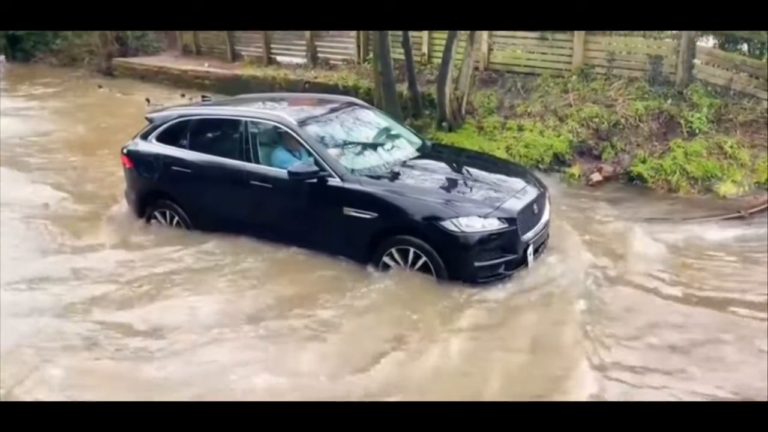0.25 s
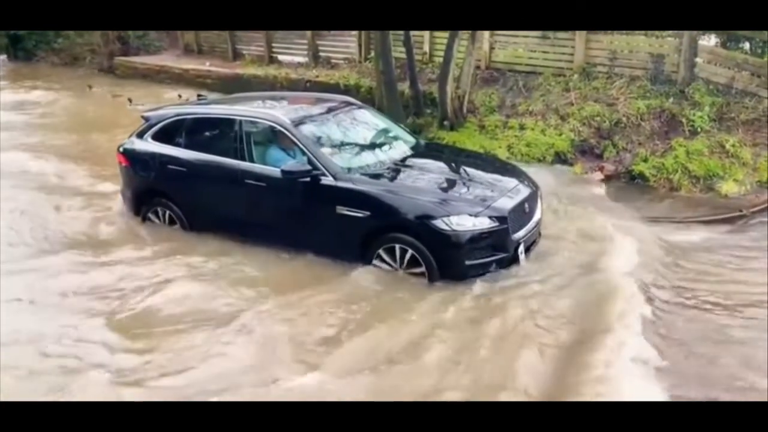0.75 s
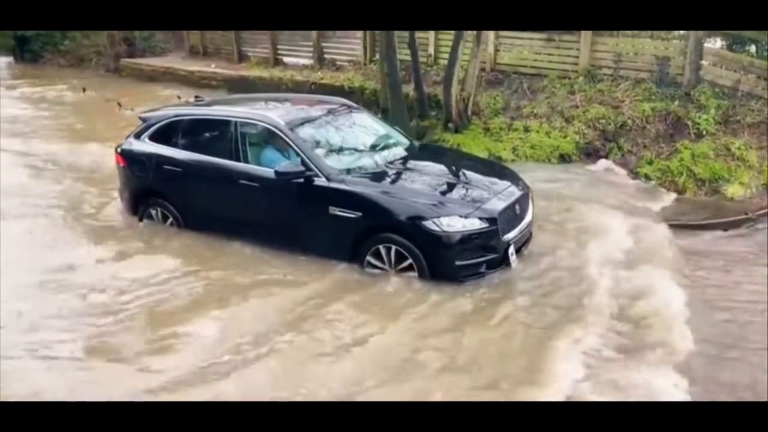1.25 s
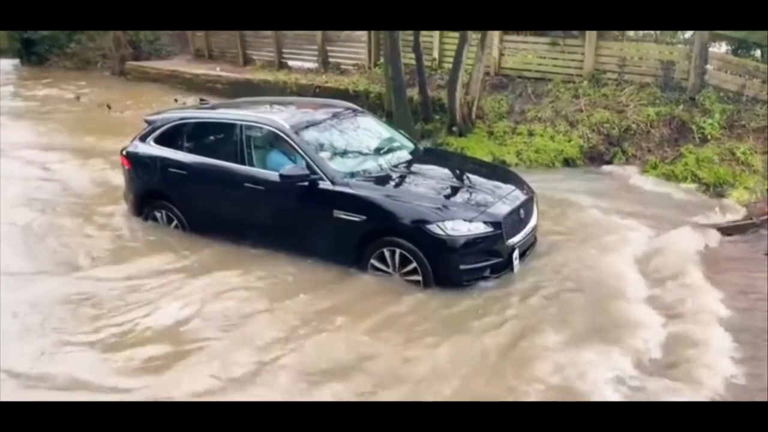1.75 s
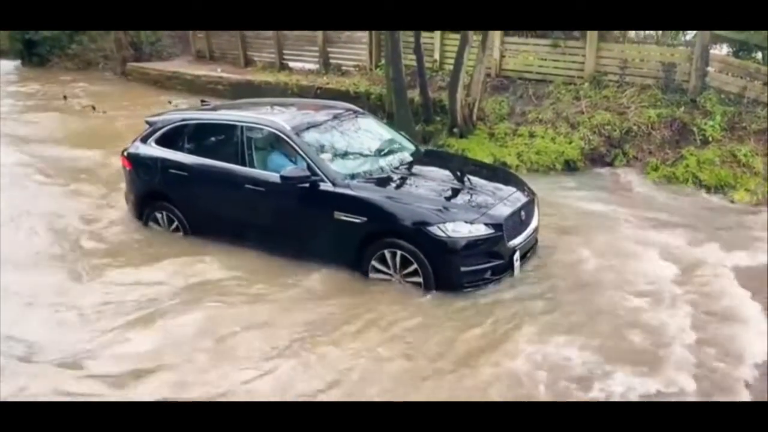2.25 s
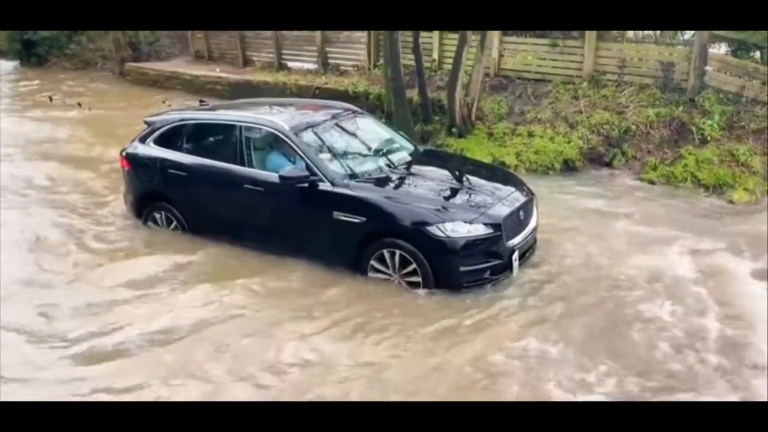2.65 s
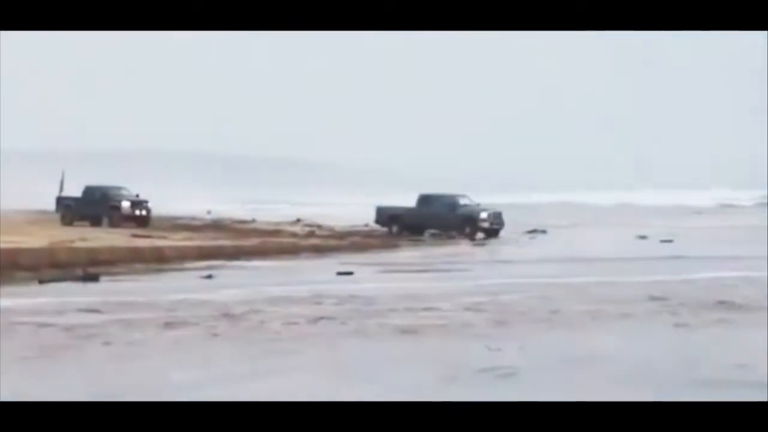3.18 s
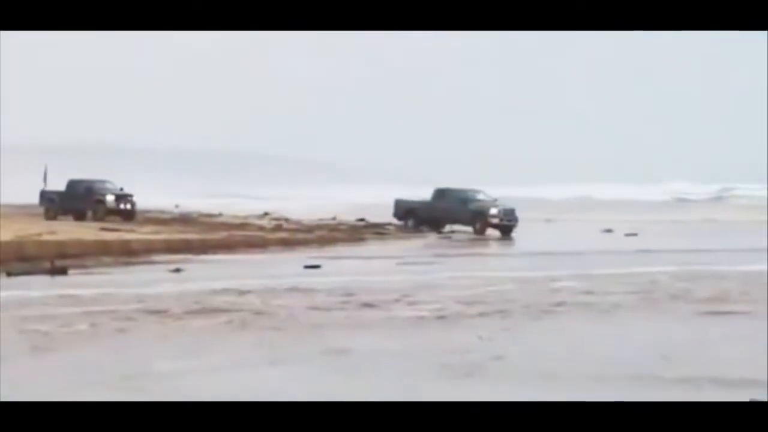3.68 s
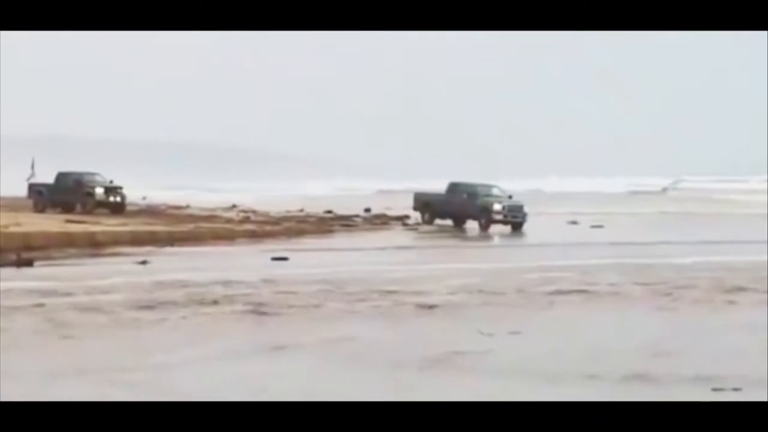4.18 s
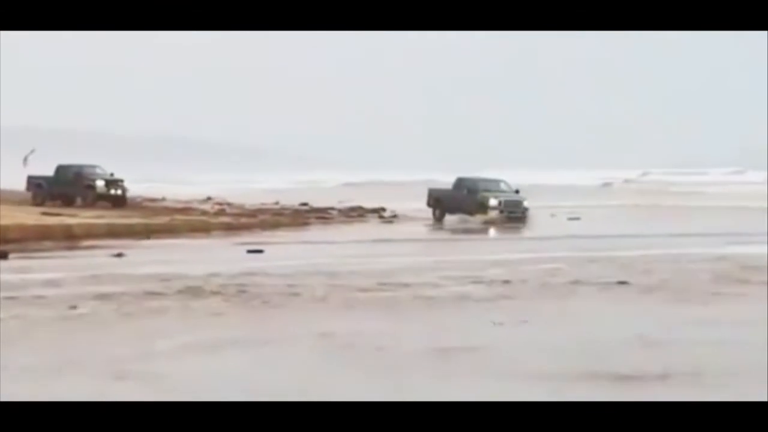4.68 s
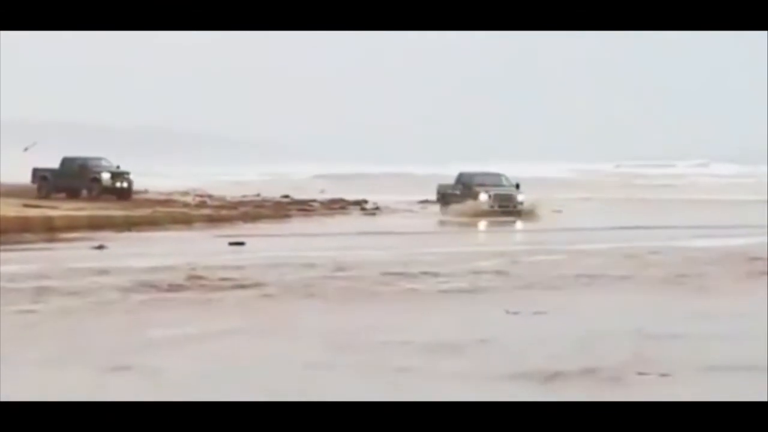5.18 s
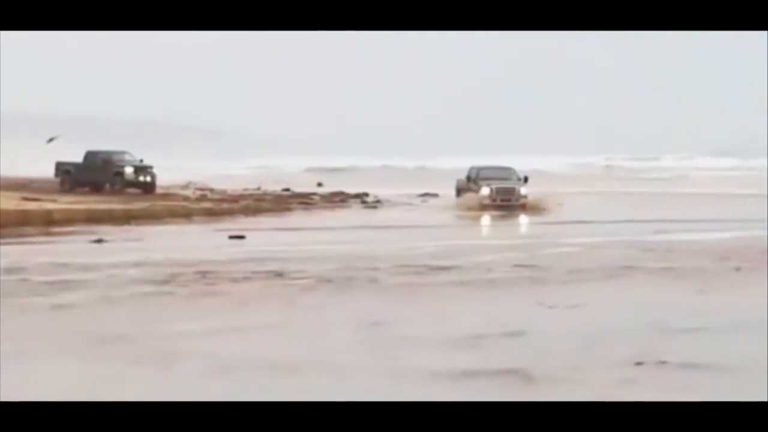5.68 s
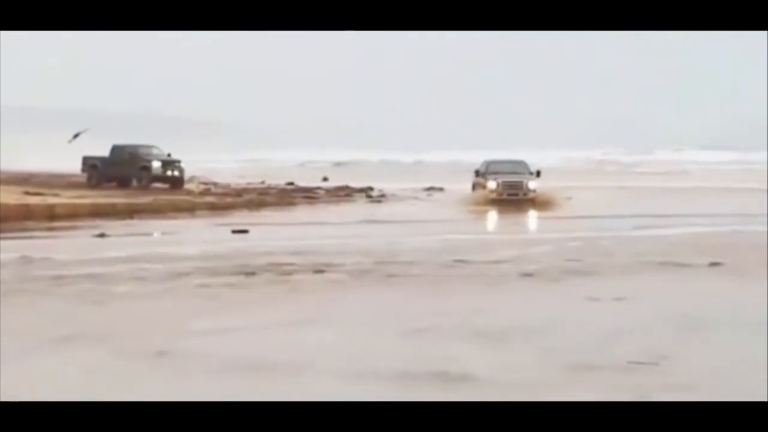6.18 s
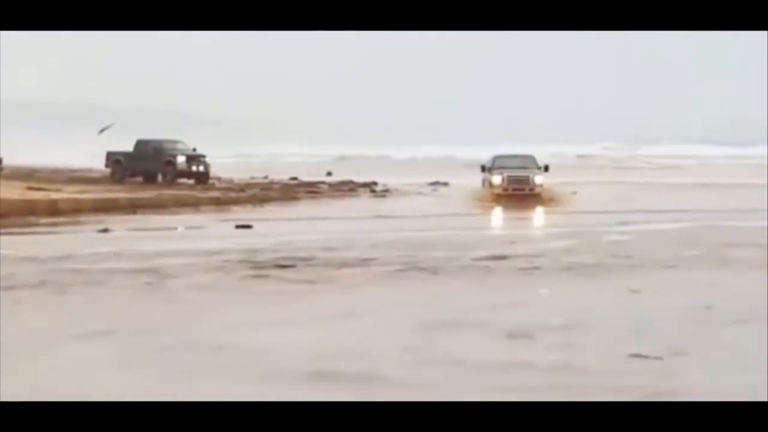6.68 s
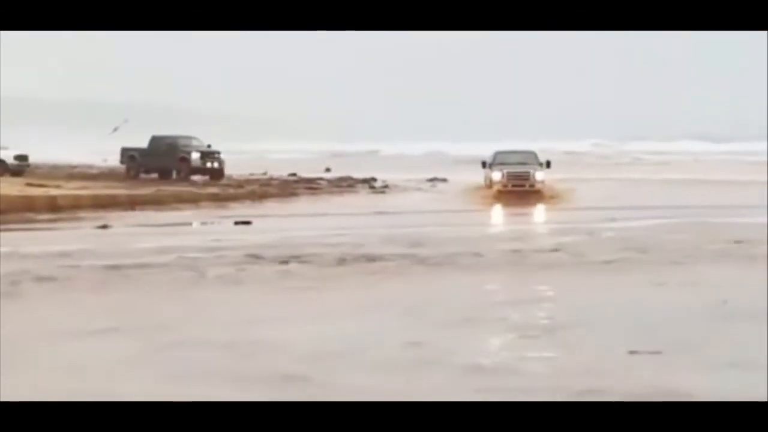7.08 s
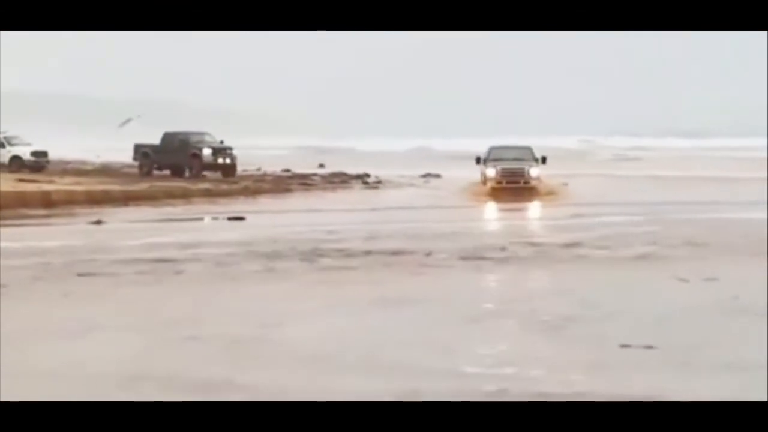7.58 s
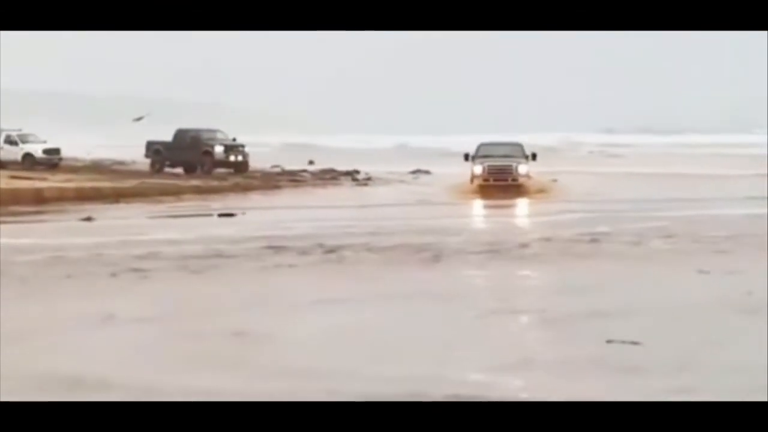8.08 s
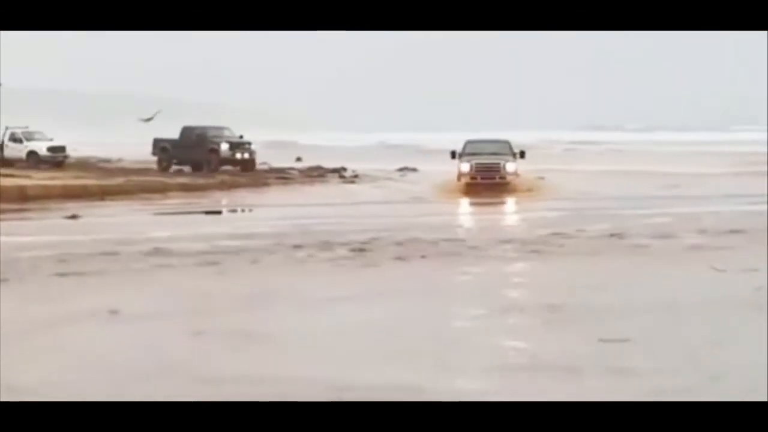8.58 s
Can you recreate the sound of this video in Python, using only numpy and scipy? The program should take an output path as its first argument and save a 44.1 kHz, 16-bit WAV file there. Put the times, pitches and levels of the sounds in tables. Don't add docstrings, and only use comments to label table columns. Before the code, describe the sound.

Close stereo water first: a car's bow wave sloshes, rushes and fizzes with gulping bubbles, strongest early, then fading away. An abrupt cut leads to an open beach, quieter at first, where low surf roar and churned water swell as a pickup wades closer. Wheels slap the water with hollow plops; one engine drones, another revs, a third blips its throttle. The beach treble is patchy, like coarse camera audio.

```python
import sys
import numpy as np
from scipy import signal
from scipy.fft import rfft, irfft, next_fast_len
from scipy.io import wavfile
from scipy.ndimage import uniform_filter1d, map_coordinates

SR = 44100
rng = np.random.default_rng(int(sys.argv[2]) if len(sys.argv) > 2 else 0)


def store_pcm(level_fs):
    pcm = np.round(np.clip(level_fs, -1, 1) * 32767).astype(np.int16)
    wavfile.write(sys.argv[1], SR, np.atleast_2d(pcm).T)


def convert_level_to_amplitude(level_db):
    exponent = np.asarray(level_db, float) / 20
    return 10 ** exponent


N = 389844
TIME = np.arange(N) / SR
LANE_END_S, BEACH_START_S = 2.589, 2.604
NEAREST_DB = -27


def unit(x):
    return x / np.sqrt(np.mean(x ** 2) + 1e-20)


def curves(rows):
    s, *cols = np.transpose(rows)
    return [np.interp(TIME, s, c) for c in cols]


def along(points, hz):
    f, *cols = np.transpose(points)
    return [np.interp(np.log(hz + 1), np.log(f + 1), c) for c in cols]


def wobble(rate):
    knots = rng.standard_normal(int(N * rate / SR) + 4)
    return map_coordinates(knots, [TIME * rate])


def patches(patchy_db, bins, frames):
    z = signal.stft(rng.standard_normal((2, N)), nperseg=512)[2]
    field = rng.standard_normal(z.shape[1:])
    field = uniform_filter1d(field, size=bins, axis=0)
    field = uniform_filter1d(field, size=frames, axis=1)
    return signal.istft(z * convert_level_to_amplitude(patchy_db * unit(field)), nperseg=512)[1][:, :N]


def spread(two, colour, pair, lo_hz, hi_hz):
    m = next_fast_len(N + 8192)
    hz = np.fft.rfftfreq(m, 1 / SR)
    band = np.sqrt((1 + (lo_hz / (hz + 1)) ** 8) * (1 + (hz / hi_hz) ** 8))
    a, b = rfft(two, m) * convert_level_to_amplitude(along(colour, hz)[0]) / band
    alike, lead, pan_db = along(pair, hz)
    turn = np.arccos(np.clip(alike, 0, 1)) / 2
    side = np.array([[1], [-1]])
    ports = np.cos(turn) * a + side * np.sin(turn) * b
    ports = ports * convert_level_to_amplitude(side * pan_db / 2) * np.exp(-.5j * side * lead)
    ports = irfft(ports, m)[:, :N]
    return ports / np.sqrt(np.mean(ports.mean(0) ** 2))


def bubbles(s, db, hz, cycles, rise):
    t = np.arange(int(3 * SR * np.max(cycles / hz)))[None] / SR
    u = t * (hz / cycles)[:, None]
    ring = np.sin(2 * np.pi * hz[:, None] * t * (1 + rise * u))
    wave = ring * np.e * 3 * u * np.exp(-3 * u) * convert_level_to_amplitude(db)[:, None]
    at = (s * SR).astype(int)[:, None] + np.arange(t.size)
    return np.bincount(at.ravel(), wave.ravel(), N + SR)[:N]


def swarm(count, t0, t1, hz, cycles, spread_db):
    def cloud(draw):
        start_s = t0 + (t1 - t0) * draw[:, 0]
        pitch_hz = hz * np.exp(2.19 * (draw[:, 1] - .5))
        level_db = -spread_db * np.log(draw[:, 2] + .02)
        return bubbles(start_s, level_db, pitch_hz, np.full(count, cycles), rise=.12)

    clouds = np.array([cloud(draw) for draw in rng.random((2, count, 3))])
    return unit(clouds) * np.sqrt((t1 - t0) * SR / N)


def tone(hz, db, jitter, shake_db):
    phase = 2 * np.pi * np.cumsum(hz * (1 + jitter * wobble(15))) / SR
    return phase, np.sqrt(2) * convert_level_to_amplitude(db + shake_db * wobble(18)) * np.sin(phase)


def passage(rows, db, jitter, shake_db):
    hz, = curves(rows)
    edge = np.clip(np.minimum(TIME - rows[0][0], rows[-1][0] - TIME + 0.04) / 0.01 + 1, 0, 1)
    phase, wave = tone(hz, db, jitter, shake_db)
    return edge * (wave + convert_level_to_amplitude(db - 17.0) * np.sin(2 * phase + 1.6))


# pitch_hz, level_db (per Hz)
SURF_COLOUR = [(18, -65), (30, -19.5), (49, -20.5), (200, -2), (396, -7.5), (544, -15.5), (599, -11.5),
               (823, -11), (1370, -16.5), (2180, -14.5), (3630, -20.5), (6360, -37), (9390, -38),
               (10100, -36.5), (13100, -62.5), (22000, -120)]
# pitch_hz, likeness_0_to_1, right_lead_rad, left_over_right_db
SURF_PAIR = [(30, .75, 0, .3), (60, .93, 0, .3), (130, .975, .03, .1), (350, .89, .1, .3),
             (700, .7, .28, .8), (1050, .5, .38, 1.2), (1400, .25, .7, 2), (2050, .25, 1.5, 2),
             (2750, .1, 3, 4.4), (5200, .07, 6.3, 4.5), (7000, .2, 6.3, 0)]


def surf(spray_db):
    def layer_db(over_spray_db, grows):
        return NEAREST_DB + over_spray_db + grows * (spray_db - NEAREST_DB)

    def heard(noise, lo_hz, hi_hz):
        return spread(noise, SURF_COLOUR, SURF_PAIR, lo_hz, hi_hz)

    surge = wobble(10)
    roar_db = layer_db(4, 0.8) - 1.13 + 0.34 * wobble(25)
    wash_db = layer_db(.5, 0.92) + 0.6 + 0.35 * surge
    roar = heard(patches(1.84, bins=2, frames=5), 15, 460) * convert_level_to_amplitude(roar_db)
    wash = heard(patches(1.4, bins=4, frames=6), 488, 1400) * convert_level_to_amplitude(wash_db)
    spray = heard(patches(1.7, bins=7, frames=5), 1400, 6000) * convert_level_to_amplitude(spray_db + 0.54 + 0.26 * surge)
    mist = heard(patches(1.2, bins=10, frames=4), 6000, 20000) * convert_level_to_amplitude(layer_db(-12.5, 1.14))
    return roar + wash + spray + mist


def drone(near_db):
    turned_away = np.clip((TIME - 7.2) / .3 + .5, 0, 1)
    line_db = -33.5 + 1.1 * (near_db - NEAREST_DB) - 8.5 * turned_away
    third_db = -37.5 - 3 * (N / SR - TIME)
    phase, line = tone(196.6, line_db, jitter=.001, shake_db=2)
    second = convert_level_to_amplitude(line_db - 7) * np.sin(2 * phase)
    third = convert_level_to_amplitude(third_db + 1.5 * wobble(8)) * np.sin(3 * phase)
    fourth = convert_level_to_amplitude(third_db - 3.5 + 3 * wobble(3.4)) * np.sin(4 * phase)
    return line + np.sqrt(2) * (second + third + fourth)


# start_s, length_s, first_pitch_hz, peak_level_db
BLIPS = [
    (7.58, .29, 172, -21.5),
    (8.04, .13, 252, -32),
]


def blip(s, length, hz, db):
    climb_hz_per_s, edge_drop_db = 285, 13
    arch_db = db - edge_drop_db * np.clip(2 * (TIME - s) / length - 1, -1, 1) ** 2
    rows = [(s, hz), (s + length, hz + climb_hz_per_s * length)]
    return passage(rows, arch_db, jitter=.002, shake_db=.4)


# time_s, pitch_hz
FIRING = [
    [(2.63, 149), (2.854, 137), (3.16, 120), (3.6, 105)],
    [(6.1, 103), (6.3, 114.5), (6.6, 117), (6.89, 120), (7.3, 136), (7.66, 135), (8.16, 138), (8.84, 140.5)],
]


def rev(rows, near_db):
    below_hz = 136 - curves(rows)[0]
    level_db = near_db + 2.6 - .62 * below_hz
    lumpy_db = .5 + .12 * np.clip(below_hz, 0, None)
    return passage(rows, level_db, jitter=.006, shake_db=lumpy_db)


def engines(near_db):
    revs = sum(rev(rows, near_db) for rows in FIRING)
    return drone(near_db) + revs + sum(blip(*row) for row in BLIPS)


# start_s, peak_level_db, pitch_hz, ring_cycles
THUMPS = [(2.614, -32, 173, 1.6), (2.686, -22, 159, 3.1), (2.864, -22, 199, 2.7), (4.334, -15, 250, 3),
          (4.772, -16.5, 293, 3.9), (4.959, -17, 257, 2.3), (5.467, -12, 195, 2.4), (6.658, -12, 212, 4.3),
          (6.78, -15, 317, 2.1), (7.564, -12, 320, 4), (8.0, -17, 298, 2.5)]


def wheel_thumps():
    return convert_level_to_amplitude(-3.0) * bubbles(*np.transpose(THUMPS), rise=0.016)


# pitch_hz, mid_step_over_signal_db, side_step_over_signal_db,
# step_scatter_db, level_scatter_db
COARSE = [(510, -40, -42, 1.5, 0.28), (1520, -14, -15.5, 2, 0.2), (2990, -5, -5, 1.5, 0),
          (5530, 2.5, 0, 2.5, 1.9), (6750, 6.5, 4.5, 2.5, 2.3), (7420, 6.5, 10, 3.5, 4),
          (9060, 7, 9.5, 3.5, 2.5), (10370, 8.5, 10.5, 3.5, 3.5)]


def beach_camera(pair):
    hop, width, bands = 1024, 32, 15
    window = signal.windows.kaiser_bessel_derived(2 * hop, 4 * np.pi)
    k = np.arange(bands * width) + .5
    angle = np.pi / hop * k[:, None] * (np.arange(2 * hop) + .5 + hop / 2)
    basis = window * np.cos(angle) * np.sqrt(2 / hop)
    lead = 2 * hop - 480
    x = np.pad([pair[0] + pair[1], pair[0] - pair[1]], ((0, 0), (lead, 2 * hop)))
    x = x[:, :x.shape[1] // hop * hop].reshape(2, -1, hop)
    lines = np.concatenate([x[:, :-1], x[:, 1:]], 2) @ basis.T
    count = lines.shape[1]

    power = uniform_filter1d(lines ** 2, size=9, axis=1)
    level = np.sqrt(uniform_filter1d(power, size=width, axis=2) + 1e-20)
    mid_db, side_db, scatter_db, mottle_db = along(COARSE, k * SR / 2 / hop)
    chance = rng.standard_normal((2, count, bands))
    chance[1] = uniform_filter1d(chance[1], size=3, axis=0) * 1.5 - .55 * chance[0]
    chance = chance.repeat(width, 2) + .7 * rng.standard_normal((count, 1))
    step = level * convert_level_to_amplitude(np.array([mid_db, side_db])[:, None] + scatter_db * chance)

    whole = np.floor(np.abs(lines) / step + 0.37)
    busy = whole.reshape(2, -1, bands, width).sum(3).repeat(width, 2) > 2
    drift = uniform_filter1d(rng.standard_normal((count, bands)), size=4, axis=0)
    drift = drift.repeat(width, 1) * 2
    frames = (np.sign(lines) * whole * step * busy * convert_level_to_amplitude(mottle_db * drift)) @ basis
    joined = (frames[:, 1:, :hop] + frames[:, :-1, hop:]).reshape(2, -1)
    mid, side = joined[:, lead - hop:][:, :N] / 2
    return np.array([mid + side, mid - side])


# time_s, level_db
NEARNESS = [
    (2.64, -40.5),
    (3.3, -41.5),
    (3.76, -37.5),
    (4.38, -34),
    (5, -31.5),
    (6.5, -27.5),
    (7.1, -27),
    (8.84, -27),
]


def beach():
    spray_db, = curves(NEARNESS)
    heard = surf(spray_db) + wheel_thumps() + engines(spray_db)
    fade_in = np.clip((TIME - BEACH_START_S) / 0.0066, 0, 1) ** 3
    return beach_camera(heard * (TIME > 2.5)) * fade_in


# start_s, peak_level_db, pitch_hz, ring_cycles
GULPS = [(.049, -28, 540, 4.9), (.08, -28, 500, 5), (.109, -28, 620, 4.5), (.179, -33, 202, 4),
         (.37, -31, 144, 4), (.539, -30, 331, 5), (.599, -31, 444, 4.5), (.699, -30, 213, 4.5),
         (1.049, -34, 293, 5), (1.736, -33, 260, 2), (1.898, -29, 640, 4.5), (1.91, -25, 700, 5.5),
         (1.984, -37, 293, 4.5), (2.09, -34, 170, 2)]


def gulps():
    return bubbles(*np.transpose(GULPS), rise=0.04) * convert_level_to_amplitude([[-2.5], [-1.5]])


# time_s, level_db
FORCE = [
    (0.0, -38),
    (.14, -36.5),
    (.47, -36.5),
    (.68, -34.5),
    (1.19, -38),
    (1.82, -40.5),
    (2.58, -41.5),
]
# pitch_hz, level_db (per Hz)
LANE_COLOUR = [(18, -38), (30, -14), (90, -2.5), (481, -8), (518, -7.5), (645, -5.5), (1210, -8),
               (1510, -5.5), (1790, -14), (1980, -8), (2400, -16.5), (3220, -18.5), (5910, -18.5),
               (7010, -24.5), (10100, -25.5), (13100, -51), (22000, -120)]
# pitch_hz, likeness_0_to_1, right_lead_rad, left_over_right_db
LANE_PAIR = [(60, 0.1, 0.5, 0), (120, 0, 3.5, 2.5), (260, 0.76, -0.2, 1), (600, 0.45, 0.56, -2.5),
             (1500, 0, 0.2, -1.5), (3000, .25, 1.9, -1.5), (5000, 0, 0.5, -2.4), (8200, 0, 3.5, 0.5),
             (10200, 1, -1, -1)]
# time_s, level_db, half_width_s
SURGES = [
    (.09, 0.5, 0.035),
    (.3, 0.7, 0.027),
    (.55, 3, 0.037),
    (.73, 1.5, 0.036),
    (1.07, -0.5, .04),
    (1.35, 0.5, .04),
]


def bow_wave():
    def heard(two, lo_hz, hi_hz):
        return spread(two, LANE_COLOUR, LANE_PAIR, lo_hz, hi_hz)

    force_db, = curves(FORCE)
    swing_db = force_db - FORCE[0][1]
    late = np.clip(TIME - 1.97, 0, 1)
    fade_db = 16 * late + 23 * late ** 2
    rush_db = force_db - fade_db
    slosh_db = rush_db - 8 + 0.3 * swing_db
    fizz_db = force_db - 0.8 * fade_db - 5 + 0.2 * swing_db
    slaps = sum(db * np.exp(-((TIME - s) / half) ** 2) for s, db, half in SURGES)
    surge = .45 * wobble(14) + slaps
    wet = TIME < LANE_END_S
    on = np.sqrt(LANE_END_S * SR / N)

    slosh = heard(patches(3.0, bins=2, frames=5), 15, 390)
    slosh = slosh * convert_level_to_amplitude(slosh_db + 2.0 + 1.2 * surge + 1.9 * wobble(17))
    gurgle = swarm(count=800, t0=0, t1=LANE_END_S, hz=1094, cycles=4.8, spread_db=1.0)
    gurgle = patches(1.8, bins=5, frames=8) + convert_level_to_amplitude(-18.0) * gurgle
    rush = heard(gurgle * wet, 284, 3100) * on * convert_level_to_amplitude(rush_db - 0.64 + 0.5 * surge)
    foam = swarm(count=700, t0=0, t1=LANE_END_S, hz=5050, cycles=2.5, spread_db=1.5)
    foam = patches(1.8, bins=12, frames=4) + convert_level_to_amplitude(-11.5) * foam
    fizz = heard(foam * wet, 2400, 14000) * on * convert_level_to_amplitude(fizz_db + 0.67 * surge)
    return slosh + rush + fizz


def flooded_lane():
    return (bow_wave() + gulps()) * (TIME < LANE_END_S)


def scene():
    return beach() + flooded_lane()


def roll_off(x):
    return signal.sosfilt(signal.butter(12, 10390, fs=SR, output="sos"), x)


def record(dry):
    top_hz = 9957
    m = next_fast_len(N + 8192)
    hz = np.fft.rfftfreq(m, 1 / SR)
    limited = irfft(rfft(dry, m) / (1 + (hz / top_hz) ** 150), m)[:, :N]
    return roll_off(limited)


dry = scene()
out = record(dry)
store_pcm(out)
```